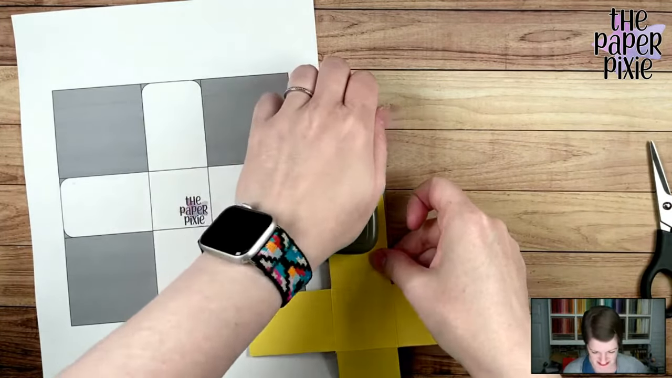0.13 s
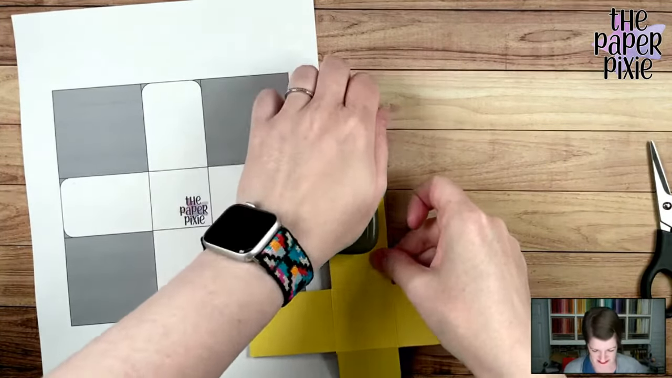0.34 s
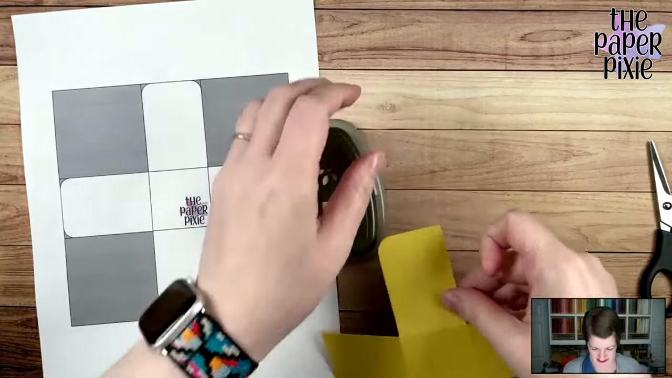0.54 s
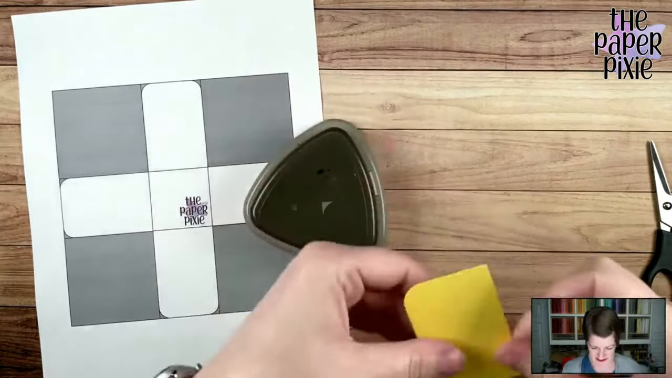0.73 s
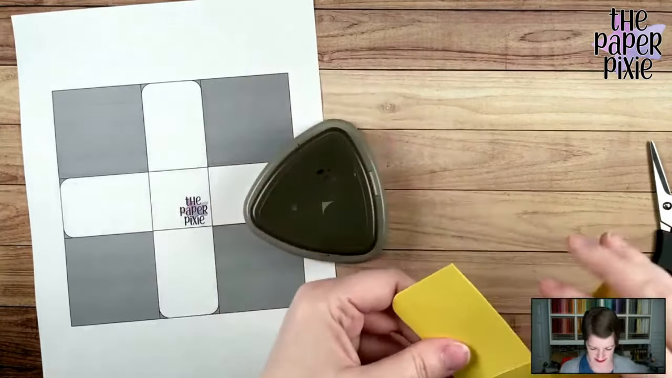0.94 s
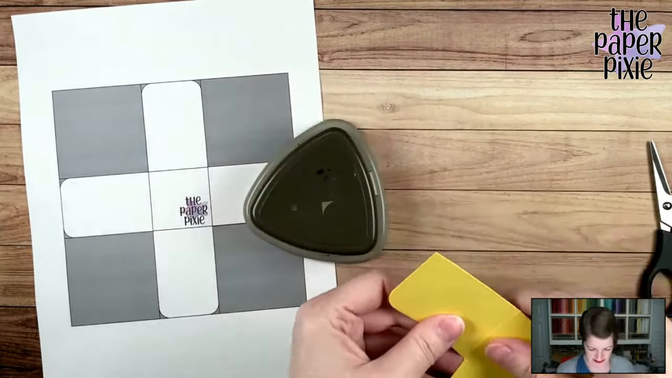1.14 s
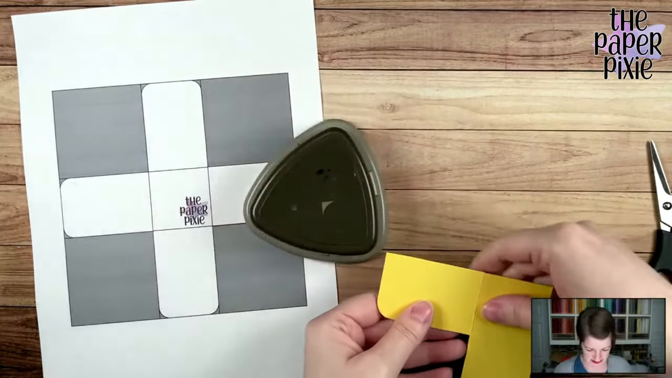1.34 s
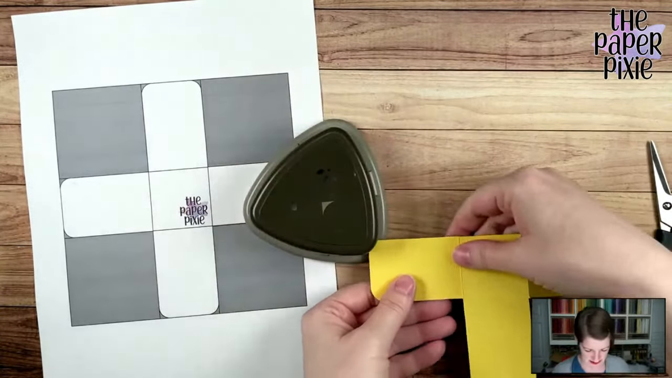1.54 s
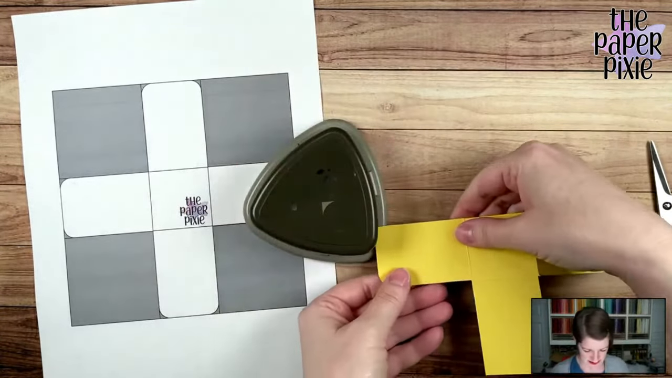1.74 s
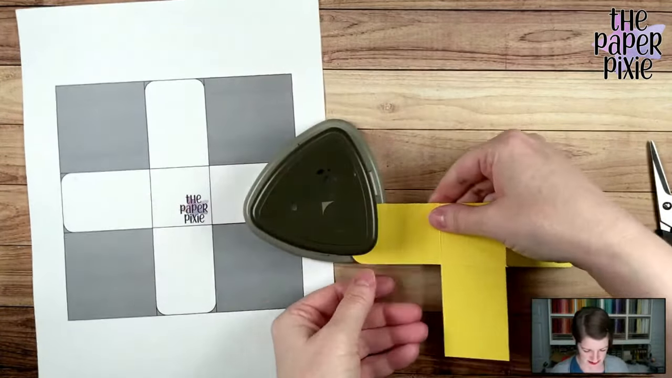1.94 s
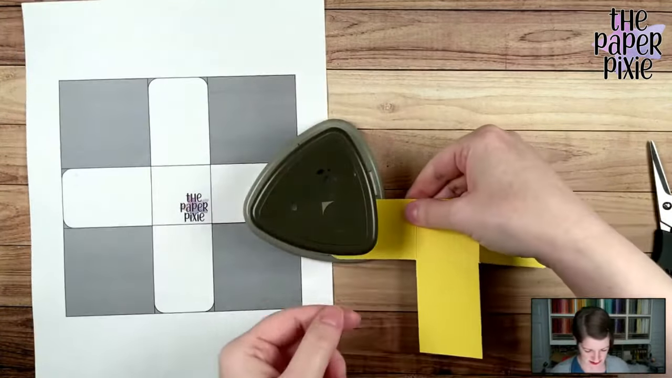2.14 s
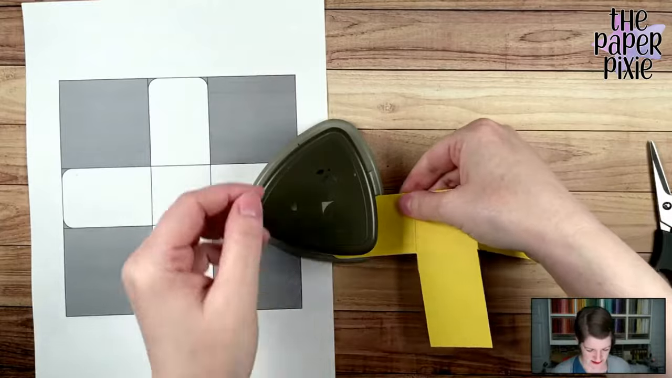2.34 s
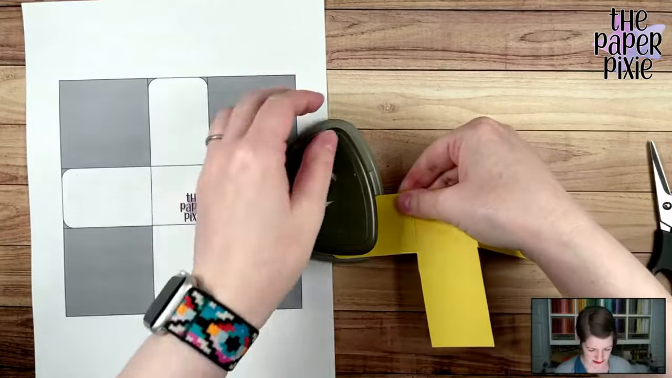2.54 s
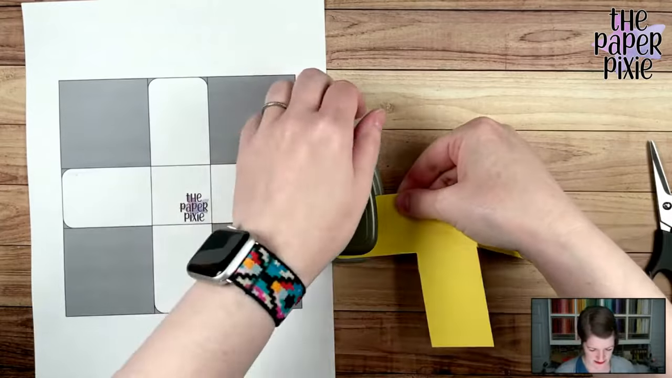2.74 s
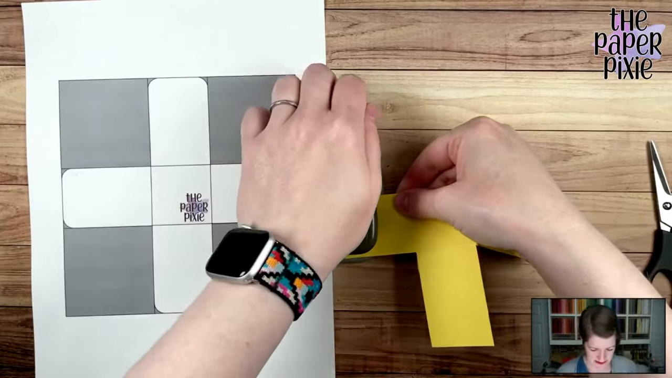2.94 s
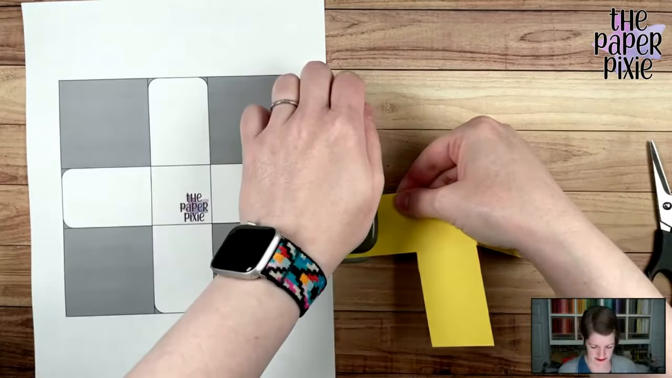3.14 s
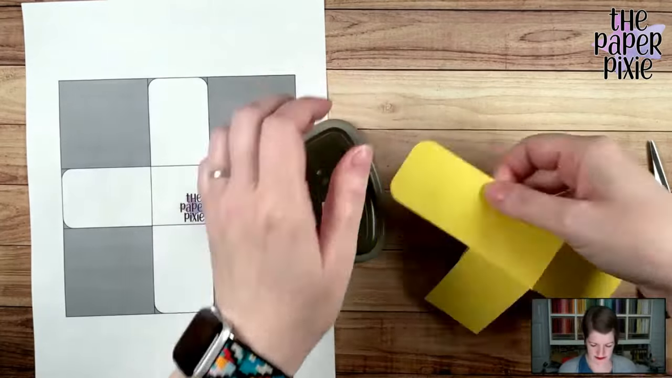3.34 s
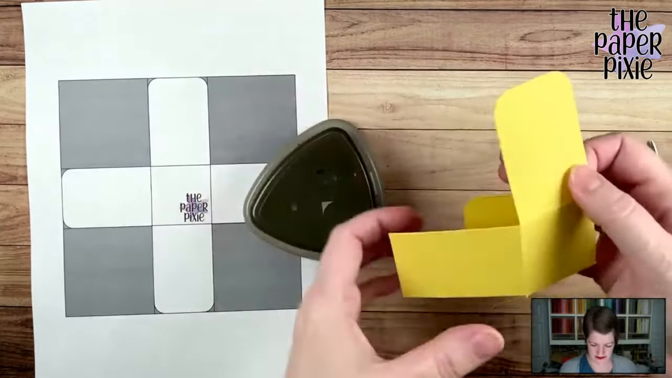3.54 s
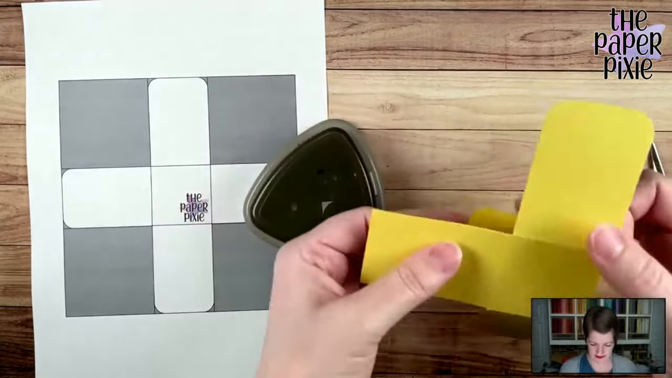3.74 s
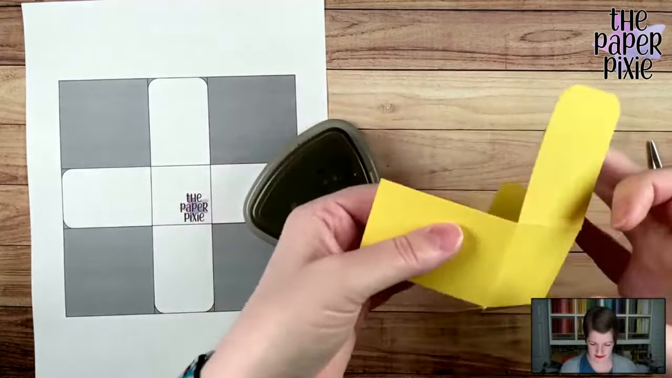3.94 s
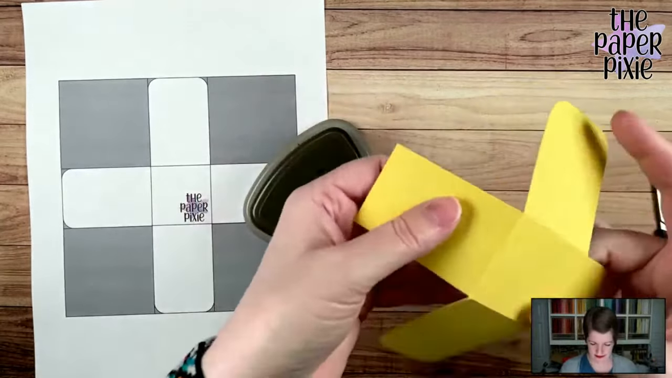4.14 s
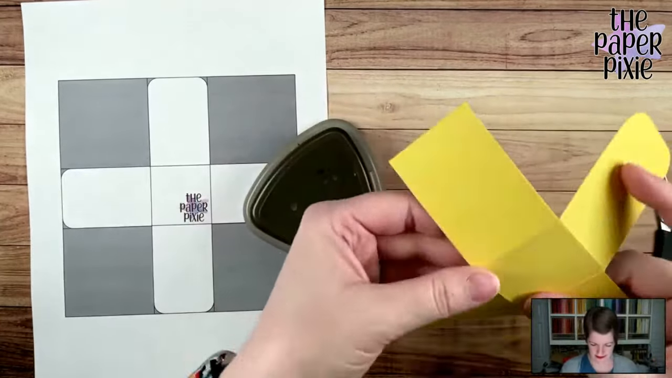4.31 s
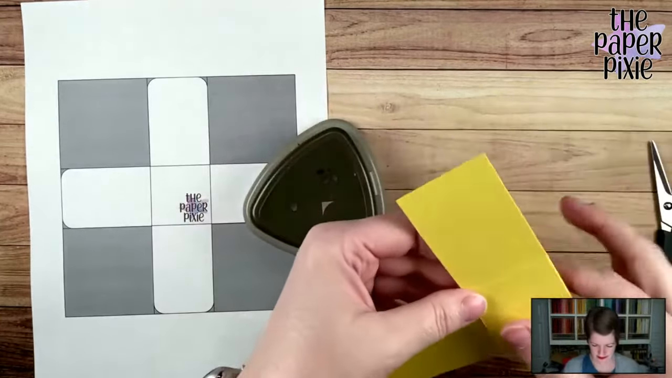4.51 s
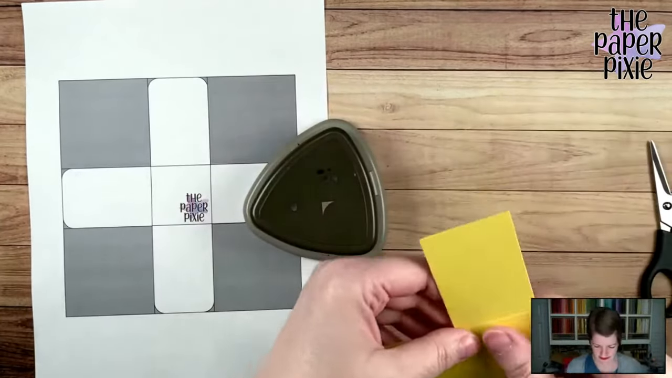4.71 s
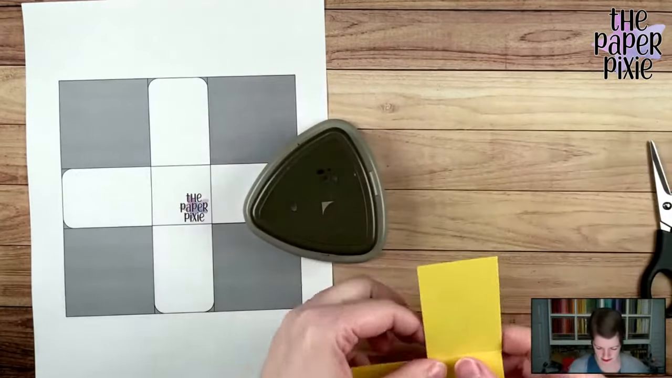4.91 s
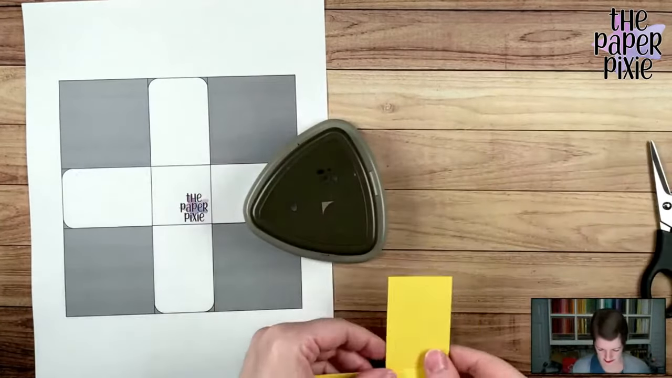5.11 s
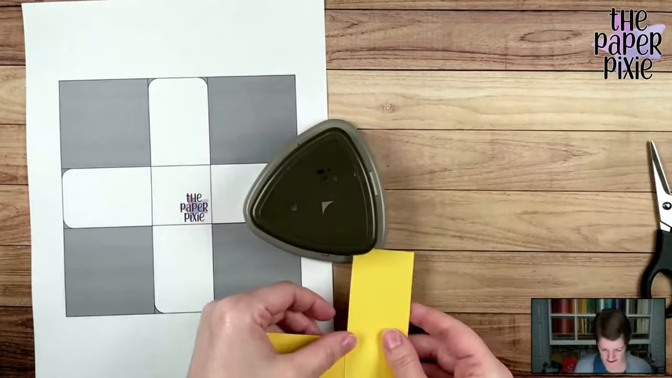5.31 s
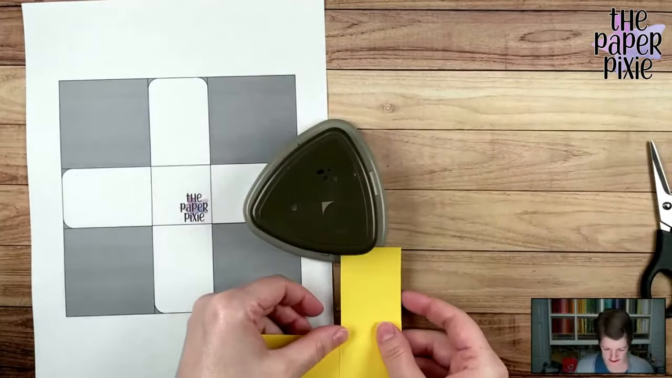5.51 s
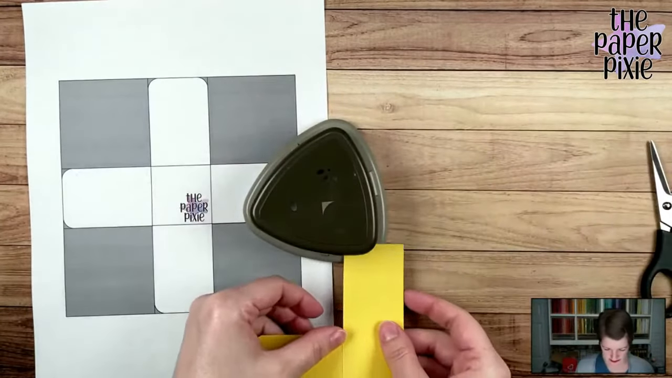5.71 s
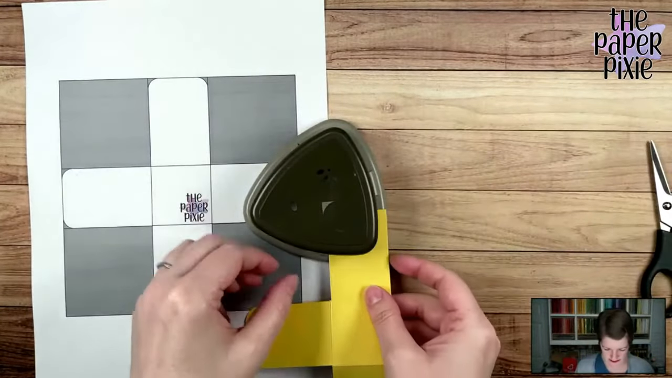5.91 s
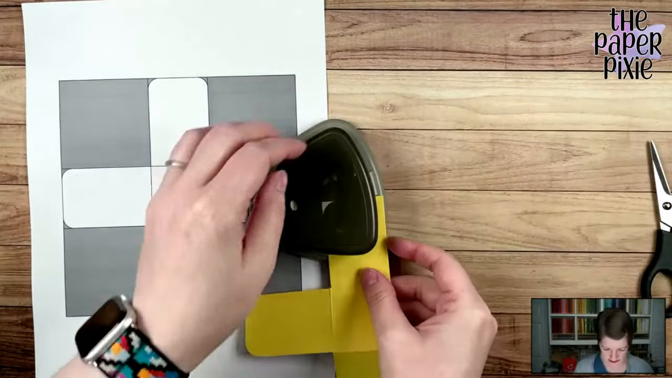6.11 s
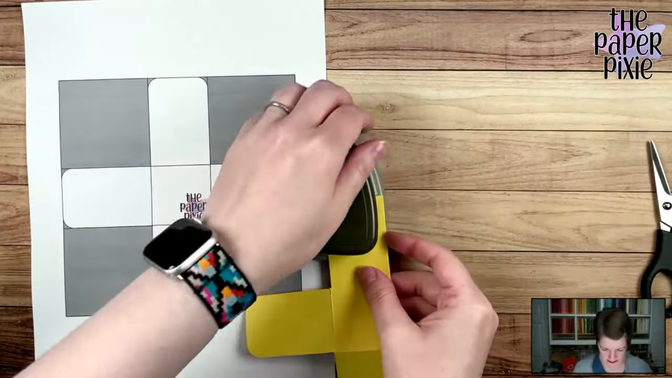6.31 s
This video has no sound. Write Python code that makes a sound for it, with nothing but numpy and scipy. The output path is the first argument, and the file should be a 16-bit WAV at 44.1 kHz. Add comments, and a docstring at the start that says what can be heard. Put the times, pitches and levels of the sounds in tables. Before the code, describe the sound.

A small, quiet room with soft steady air noise and a barely audible hum; the microphone is close to a wooden table. At 0.03-0.1 s a plastic punch is pressed through card: a quick cluster of crunchy cracks, a bright snap and a hollow low thump. Lighter spring-back clicks follow at about 0.25 and 0.4 s, with a dry card rub. From 0.6 to 2.2 s, fingers slide and turn the card with faint grainy scrapes and tiny ticks, the clearest around 1.1, 1.5 and 1.8 s. At 2.82-2.9 s the second press builds fast into a sharp crack and firm thud, releasing with clicks and a short swish at 3.0-3.2 s. Soft card handling continues, with small flicks around 3.5 and 4.2 s, a distinct tap at 4.75 s, a little tick cluster at 5.4 s, then near stillness until about 6.5 s.

```python
"""Corner punch and card on a wooden table

A hand presses a plastic corner punch twice: the blade crunches through card, snaps home, thumps the table
and springs back. Snaps are filtered noise bursts; thumps are force pulses that ring modes of table top and punch.
Between presses fingers slide, flick and seat the card: grainy friction noise and short ticks.
The small quiet room adds sparse decaying echoes, steady air noise and a faint hum."""
import sys
import numpy as np
from scipy import signal
from scipy.fft import rfft, irfft
from scipy.io import wavfile
from scipy.ndimage import uniform_filter1d

SR = 44100
rng = np.random.default_rng(int(sys.argv[2]) if len(sys.argv) > 2 else 0)


def field_ratio(decibels):
    """Amplitude ratio for a level in dB (20 dB per decade); scalars and array-likes work."""
    return 10 ** (np.asarray(decibels, dtype=float) / 20)


def store_pcm(level_fs):
    """Save levels as 16-bit WAV."""
    pcm = np.round(np.clip(level_fs, -1, 1) * 32767).astype(np.int16)
    wavfile.write(sys.argv[1], SR, np.atleast_2d(pcm).T)


N = 284709

# Noise spectrum of room air and preamp: [f/Hz, relative level per Hz/dB]
HUSH_SPECTRUM = [(12, -12), (20, -6), (113, -8.5), (210, -11), (241, -10), (328, -12.5), (485, -18.5),
                 (558, -15), (738, -18.5), (1570, -21.5), (4060, -28.5), (12800, -30), (16000, -29.5)]
# Mains hum: [f/Hz, rms level/dB]
HUM_TONES = [(118.4, -83.5), (242.2, -85)]
# Reverberation of the room: [f/Hz, t60/s]
ROOM_DECAY = [(100, 0.83), (400, 0.43), (1500, 0.39), (5000, 0.28), (12000, 0.24)]
# Spectrum of card friction: [f/Hz, relative level per Hz/dB]
RUB_COLOUR = [(120, -41.5), (200, -8.5), (519, -4.5), (709, -11), (1000, -6.5), (2210, -3), (2750, -3),
              (4430, -0.5), (9400, -5), (16000, -21.5)]
# Bending modes of the card: [ratio to the lowest, share of its lift]
CARD_MODES = [(1, 0.93), (1.349, 0.54), (2.102, 0.46), (3.3, 0.27)]
# Faint rustle of hands and card between strokes: [t/s, relative level/dB]
RUSTLE_LEVEL = [(0, -57), (.56, -70), (.8, -65), (1.3, -68.5), (1.62, -67), (1.9, -65), (2.2, -66),
                (2.4, -75), (2.76, -73), (2.85, -59.5), (3.3, -69.5), (3.55, -60), (3.8, -66), (4.3, -63),
                (4.6, -64.5), (5.1, -66), (5.5, -66), (6, -71), (6.15, -64.5), (6.27, -75.5), (6.456, -73)]
# Strokes of the card on card, skin, wood and the punch slot:
# [t at full speed/s, rise/s, hold/s, relative level/dB, tilt/dB per octave, scrape lift/dB]
STROKES = [(.1, .02, 0.14, -52.5, -2, 4), (0.283, 0.0067, 0.099, -57, -1, 16.5),
           (0.613, 0.013, 0.064, -60, -6.3, -13), (0.837, 0.013, 0.034, -49, -1.5, 0),
           (0.977, 0.085, 0.094, -61, 3.1, 13), (1.123, 0.018, .12, -61.5, 2.5, -9),
           (1.366, .01, 0.095, -62.5, 2, 11), (1.791, 0.048, 0.07, -58, -1.5, 11),
           (1.925, .03, 0.099, -64, -5, 8), (2.24, .03, 0.059, -71.5, -6, 15),
           (2.9, .02, 0.1, -49.5, -8.5, 0), (3.136, 0.037, 0.025, -45.5, -1, 7.5),
           (3.17, 0.0091, 0.015, -54.5, -2.5, 13), (3.326, 0.09, 0.064, -69, -8, -12),
           (3.61, 0.024, 0.088, -64, 3.5, 0), (3.695, .02, 0.017, -69, 4, 1.5),
           (3.996, 0.042, 0.036, -53.5, -0.7, -6), (4.083, .03, 0.2, -59, -1, -3),
           (4.348, 0.022, .04, -65, 5.5, 7), (4.707, 0.067, 0.032, -56.5, 1.5, 5),
           (4.861, 0.013, 0.052, -59, 3.5, 1), (5.003, .02, 0.057, -63.5, -3.5, 7),
           (5.155, 0.045, 0.071, -62, -3, 4), (5.652, 0.042, 0.17, -60, -3.5, 17.5),
           (5.793, 0.028, 0.038, -66.5, 6.5, 6), (5.85, .01, 0.053, -67.5, -6, 16),
           (6.4, 0.068, .06, -77, -7.5, 2)]
# Sway of the microphone stand: [f/Hz, relative level/dB, t60/s]
STAND_MODES = [(24.6, -14, 1.8), (29.5, -18, 1.2)]
# Modes of the table top and, above about 500 Hz, of the punch housing: [f/Hz, relative level/dB with
# the punch in its first place, relative level/dB after it has shifted, t60/s]
THUMP_MODES = [(61, -16, -22, 0.84), (90.2, -25, -4.5, 0.12), (104.9, -8.5, -1.5, 0.14),
               (138.5, -13.5, -17, 0.13), (176.4, -6.5, -2.5, 0.2), (217.5, -2, -2, 0.12),
               (254, -24, -16, 0.78), (309, 4, -6.5, 0.14), (336, -4, -14, 0.18), (365, -18, -9.5, 0.06),
               (386, -34, -9, 0.24), (475, -32, -7.5, 0.087), (570, -14, -16.5, 0.2), (770, -19, -19, 0.27),
               (770, -2, -9, 0.12), (892, 0, -16, 0.22), (917, 0.5, -16.5, 0.086), (1000, -6.5, -7.5, 0.04),
               (1250, 6, -6.5, 0.097), (1410, -24, -10.5, 0.091), (1730, -15.5, -23, 0.1)]
# Blows of punch and hand into the table: [t/s, relative force/dB, contact/ms, sign of the force pulse]
BLOWS = [(0.008, -45, 7, 1), (0.034, -32.5, 4.7, -1), (0.064, -18, 1.6, -1), (0.071, -19.5, 3.4, 1),
         (0.076, -42.5, 13, -1), (0.079, -20.5, 0.83, -1), (.082, -17.5, 3.1, 1), (0.245, -41.5, 4.7, 1),
         (0.641, -52.5, 2.6, 1), (0.858, -49.5, 1.42, 1), (2.803, -54, 5.8, 1), (2.824, -42, 4.1, 1),
         (2.843, -38, 2.9, 1), (2.863, -31.5, 1.8, -1), (2.873, -26, 5, -1), (2.886, -21, 3.7, -1),
         (2.8879, -6.5, 0.65, 1), (2.896, -13.5, 1.25, 1), (3.055, -38.5, 4.6, 1), (3.49, -63, 16, 1),
         (4.754, -56.5, 3.2, 1), (6.122, -60.5, 5.8, 1)]
# Ticks of the card edge on nail, punch and table:
# [t/s, peak level/dB, f of the struck part/Hz, its level above the crack/dB, t60/ms (at least 3 is used)]
CARD_TICKS = [(.636, -50, 3450, 8, 29), (.97, -62, 1250, 13, 156), (1.096, -47.5, 1200, 15.5, 25.4),
              (1.212, -54, 2310, 0, 16.6), (1.517, -46.5, 1300, 4.5, 13.2), (1.799, -48.5, 1300, 6, 12.5),
              (1.839, -63.5, 520, 13, 170), (3.455, -59, 3110, 7, 35), (3.484, -49, 2300, 8.5, 30.6),
              (3.615, -55.5, 8700, 12, 16.7), (3.753, -63, 1020, -8, 26), (3.82, -67.5, 1930, 18, 190),
              (4.035, -52, 1500, -8, 13.5), (4.236, -57.5, 1000, 8, 60), (4.24, -52, 2860, 11, 51),
              (4.27, -54, 6530, 9, 10), (4.438, -54.5, 2620, 8, 13), (4.52, -60.5, 3780, 16, 48),
              (4.7495, -38.5, 1050, 5.5, 17.4), (4.757, -56, 640, 14, 90), (4.8, -76, 605, 7, 66),
              (5.2, -68, 3700, 14, 150), (5.251, -65, 3170, 20, 37), (5.305, -68, 3040, 32, 93),
              (5.378, -55, 2800, 9, 40), (5.382, -46, 2270, 23, 17.7), (5.386, -46, 3140, 20, 14.6),
              (5.486, -65.5, 5980, 0, 15), (5.649, -53.5, 5860, 8, 4.1), (5.77, -59.5, 10200, 4, 175),
              (6.110, -55, 2340, 12.5, 44)]
# Snaps of blade, lid and spring: same columns
PUNCH_SNAPS = [(0.02, -50.5, 780, 12, 29), (.034, -44, 770, 2.5, 30), (0.063, -33.5, 2600, 7, 52),
               (.068, -29.5, 810, 4.5, 37), (0.078, -21, 6040, 3.5, 12.8), (.093, -30.5, 1460, 7, 49),
               (0.243, -35, 2490, 8, 28.5), (.247, -40.5, 770, 45, 60), (.256, -42, 2250, 12, 64),
               (.296, -52, 785, 27, 50), (.337, -47, 2200, 13, 32), (0.392, -36, 6430, 7.5, 18.8),
               (.397, -48, 2120, 28, 26.7), (2.823, -48, 2010, -6, 40), (2.865, -38, 1020, -1, 28),
               (2.871, -32, 3820, 16, 21.3), (2.875, -23, 3200, 5, 20.8), (2.885, -24.5, 8900, 7, 11),
               (2.895, -28, 1372, 6.5, 40), (3.021, -44, 4260, 12, 40), (3.044, -38.5, 3660, 16, 26),
               (3.057, -39.5, 2420, 9, 70), (3.062, -42.5, 880, 6, 70), (3.148, -46, 3820, 20, 24),
               (3.188, -43, 4800, 10.5, 20.6)]


def evened(x):
    """Normalization: scales a signal to rms 1."""
    return x / np.sqrt(np.mean(x ** 2) + 1e-20)


def read(points, hz):
    """Linear interpolation of a table on a log-frequency axis."""
    f, value = np.transpose(points)
    return np.interp(np.log(hz + 1), np.log(f + 1), value)


def add(mix, s, sound):
    """Superposition: adds a sound into the mix at s seconds."""
    part = mix[max(round(s * SR), 0):][:len(sound)]
    part += sound[:len(part)]


def shaped(x, field_db):
    """Time-varying filtering: weights short-time spectra by field_db(hz, t)."""
    hz, t, spectra = signal.stft(x, SR, nperseg=256)
    weighted = spectra * field_ratio(field_db(hz[:, None], t))
    return signal.istft(weighted, SR, nperseg=256)[1][:len(x)]


def hush():
    """Stationary noise: coloured air and preamp noise with steady sinusoids of mains hum."""
    hz, t = np.fft.rfftfreq(N, 1 / SR), np.arange(N) / SR
    white = rfft(rng.standard_normal(N))
    air = evened(irfft(white * field_ratio(read(HUSH_SPECTRUM, hz)), N))
    hum = sum(field_ratio(db) * np.sqrt(2) * np.sin(2 * np.pi * f * t) for f, db in HUM_TONES)
    return field_ratio(-70) * air + hum


def room(x, count=3, turn_hz=3.3):
    """Reverberation: sparse echoes of random sign, each band decaying exponentially at its own rate."""
    slots, t, out = np.arange(150, SR - 20, 20), np.arange(N) / SR, np.zeros(N)
    for k in range(count):
        echoes = np.zeros(SR)
        echoes[slots + rng.integers(0, 20, len(slots))] = rng.choice([-1., 1.], len(slots))
        tail = shaped(echoes, lambda hz, t: -60 * t / read(ROOM_DECAY, hz))
        # several echo patterns take turns, so that no single one colours the room; squared shares sum to 1
        share = np.sqrt(2 / count) * np.cos(2 * np.pi * (turn_hz * t + k / count))
        out += signal.oaconvolve(x * share, tail / np.linalg.norm(tail))[:N]
    return out


def friction_noise(grains_per_s=6000, grit_db=0.87):
    """Friction: fibres catch as dense grains of uneven size over a smooth noise floor."""
    caught = rng.random(N) < grains_per_s / SR
    size = field_ratio(2.5 * np.minimum(rng.exponential(1, N), 4)) * caught
    fibres = evened(size * rng.standard_normal(N)) + 1.2 * rng.standard_normal(N)
    # the edge sticks and slips
    grit = evened(uniform_filter1d(rng.standard_normal(N), 200))
    return evened(fibres * field_ratio(grit_db * grit))


def rub(patchy_db=2.0, scrape_hz=2900, fade_db_per_s=203):
    """Resonance under friction: the card's stiffness lends broad peaks to the noise of its strokes."""
    patches = uniform_filter1d(rng.standard_normal((N // 128 + 2, 129)), 12, 0)
    patches = evened(uniform_filter1d(patches, 4, 1)).T

    def field_db(hz, t):
        """Incoherent addition: rustle and strokes add in power, then take colour and drifting patches."""
        bumps = sum(share * np.exp(-((hz - ratio * scrape_hz) / 330) ** 2) for ratio, share in CARD_MODES)
        octaves = np.log2(np.maximum(hz, 300) / 4000)
        # the rustle tilts by -4 dB per octave and has no scrape peaks
        power = field_ratio(np.interp(t, *np.transpose(RUSTLE_LEVEL)) - 4 * octaves) ** 2
        for s, rise, hold, db, tilt_db, scrape_db in STROKES:
            onset = np.clip((t - s) / max(rise, .003) + 1, 0, 1)
            fade = field_ratio(-fade_db_per_s * np.maximum(t - s - hold, 0))
            power = power + (onset * fade * field_ratio(db + tilt_db * octaves + scrape_db * bumps)) ** 2
        return read(RUB_COLOUR, hz) + 10 * np.log10(power) + patchy_db * patches[:, :len(t)]
    return shaped(friction_noise(), field_db)


def thumps(shift_s=2.2):
    """Modal excitation: short force pulses ring damped modes of table top and punch housing and sway the stand."""
    # one row of force for each place of the punch
    force, t = np.zeros((2, N)), np.arange(2 * SR) / SR
    for s, db, ms, sign in BLOWS:
        pulse = np.hanning(round(ms * SR / 1000) + 2)
        add(force[int(s > shift_s)], s - ms / 2000, np.sign(sign) * field_ratio(db) * pulse)
    hz, *place_db, t60 = np.transpose(THUMP_MODES)
    modes = field_ratio(-60 * t / t60[:, None]) * np.cos(2 * np.pi * hz[:, None] * t - .6)
    ringing = signal.oaconvolve(force, field_ratio(np.array(place_db)) @ modes, axes=1).sum(0)
    # the table top radiates little below its lowest mode
    ringing = signal.sosfilt(signal.butter(2, 60, "high", fs=SR, output="sos"), ringing)
    sway = sum(field_ratio(db - 60 * t / t60) * np.sin(2 * np.pi * hz * t) for hz, db, t60 in STAND_MODES)
    sway *= 1 - np.exp(-t / 0.039)  # the sway builds up gradually
    stand = 0.77 * signal.oaconvolve(abs(force).sum(0), sway)
    return (ringing + stand)[:N] / 100


def snaps(rows, tilt_db, tilt_per_octave, rise_share, low_hz, top_hz, width=0.25):
    """Fracture and impact: each burst of tearing noise has one band lifted by the resonance of the struck part."""
    out, t, hz = np.zeros(N), np.arange(4096) / SR, np.fft.rfftfreq(4096, 1 / SR) + 1
    edges = 1 / (1 + (low_hz / hz) ** 4) / (1 + (hz / top_hz) ** 4)
    noises = rng.standard_normal((len(rows), 4096))
    for (s, db, part_hz, part_db, ms), noise in zip(rows, noises):
        # the tilt depends on the pitch of the struck part
        part_tilt_db = tilt_db + tilt_per_octave * np.log2(part_hz / 2000)
        lift_db = part_db * np.exp(-(np.log2(hz / part_hz) / width) ** 2)
        colour_db = part_tilt_db * np.log2(hz / 2000) + lift_db
        t60 = max(ms, 3) / 1000
        rise = rise_share * t60  # longer snaps start softer
        swell = field_ratio(-60 * t / t60) * (1 - np.exp(-t / rise)) ** 3
        crack = irfft(rfft(noise) * field_ratio(colour_db) * edges) * swell
        # the burst gets the energy of its envelope at peak 1
        crack *= np.linalg.norm(swell) / swell.max() / np.linalg.norm(crack)
        add(out, s - rise, field_ratio(db) * crack)
    return out


def card_ticks():
    """Edge impact: the card edge ticks on nail, punch and table with a mild spectral tilt (dB per octave)."""
    return snaps(CARD_TICKS, tilt_db=-3, tilt_per_octave=0.11, rise_share=.15, low_hz=380, top_hz=12500)


def punch_snaps():
    """Impact of small parts: blade, lid and spring crack brighter the higher the pitch of the part."""
    return snaps(PUNCH_SNAPS, tilt_db=-7.5, tilt_per_octave=2.3, rise_share=.09, low_hz=600, top_hz=16000)


def scene():
    """Direct and reverberant sound: punch, table and card close to the microphone, with the room behind."""
    punch, card, thump = punch_snaps(), card_ticks(), thumps()
    close = punch + card + thump + rub()
    echoes = room(field_ratio(-6) * punch + field_ratio(-7) * card + field_ratio(-17) * thump)
    return (close + echoes + hush())[None]


def roll_off(x):
    """The treble ends steeply here."""
    return signal.sosfilt(signal.butter(12, 16640, fs=SR, output="sos"), x)


def record(dry):
    """Band limitation: a linear-phase low-pass removes the sound above 15.9 kHz."""
    low_pass = signal.firwin(255, 15900, fs=SR)
    limited = signal.oaconvolve(dry, low_pass[None], "same")
    return roll_off(limited)


dry = scene()
out = record(dry)
store_pcm(out)
```